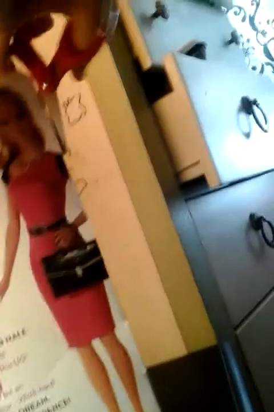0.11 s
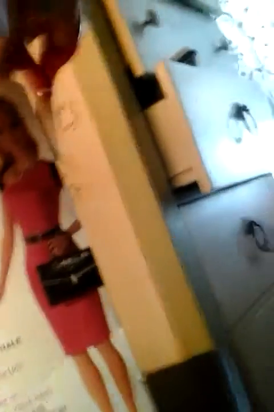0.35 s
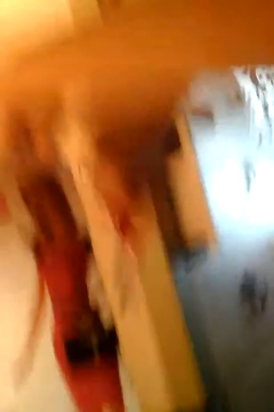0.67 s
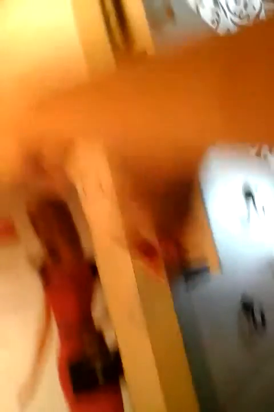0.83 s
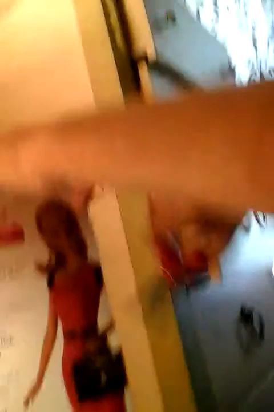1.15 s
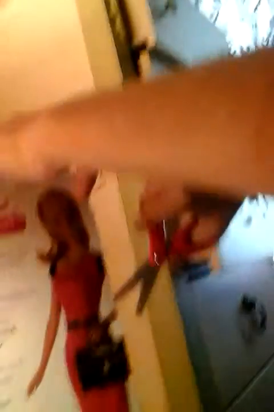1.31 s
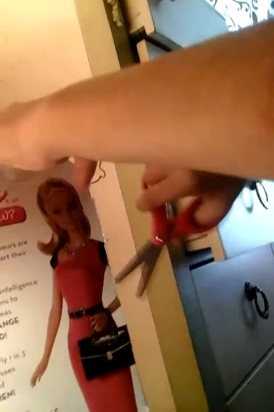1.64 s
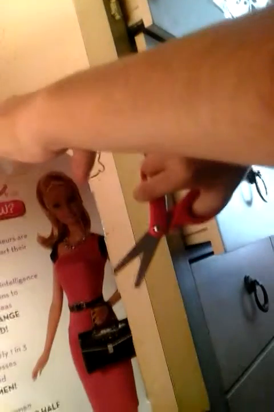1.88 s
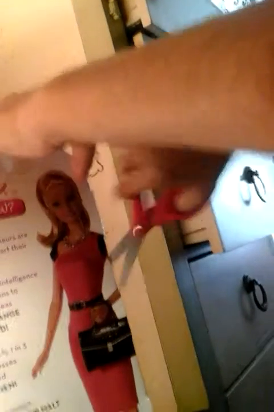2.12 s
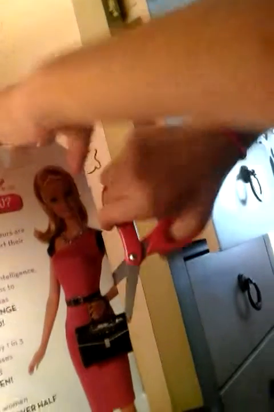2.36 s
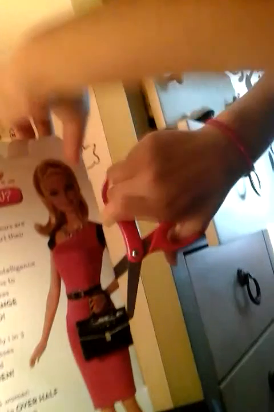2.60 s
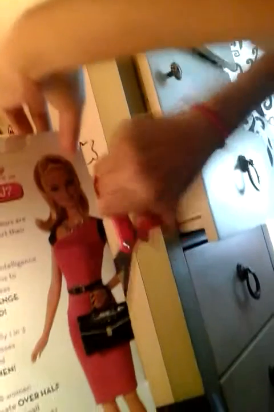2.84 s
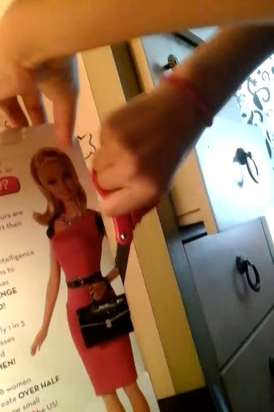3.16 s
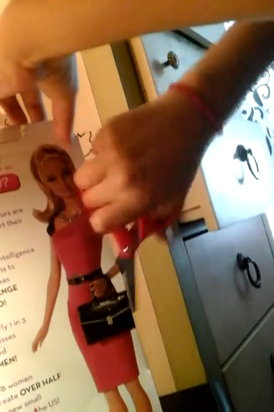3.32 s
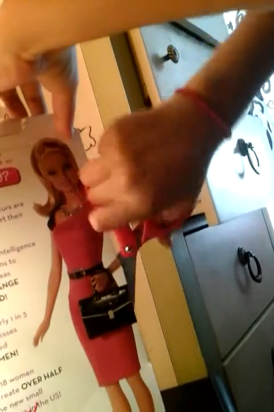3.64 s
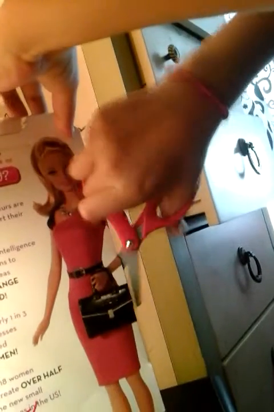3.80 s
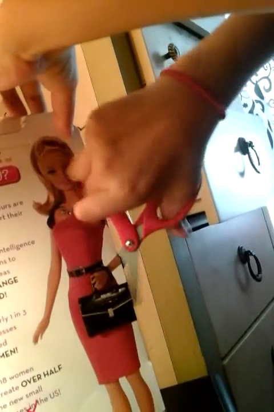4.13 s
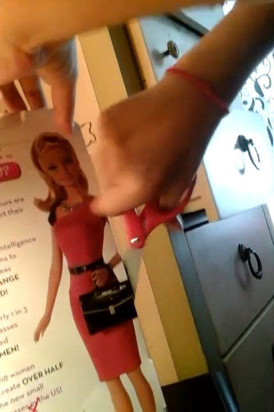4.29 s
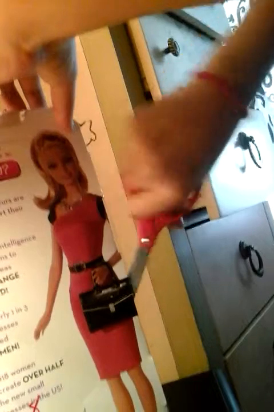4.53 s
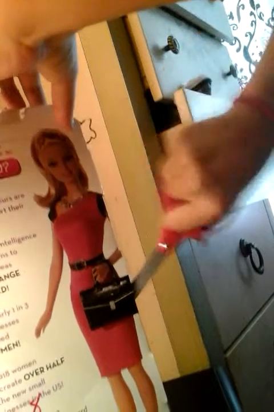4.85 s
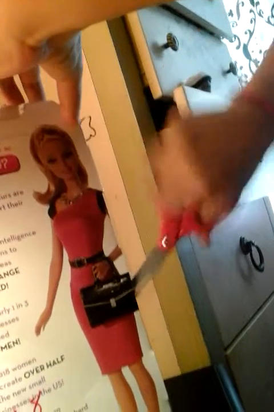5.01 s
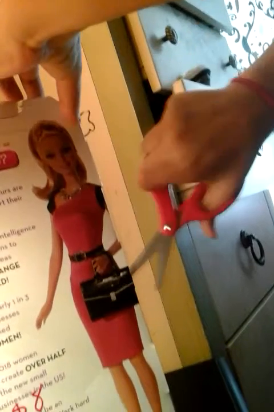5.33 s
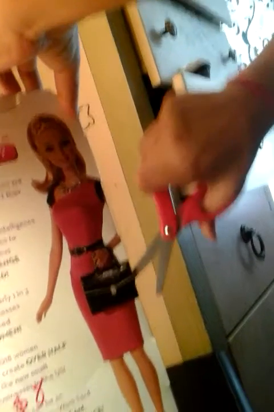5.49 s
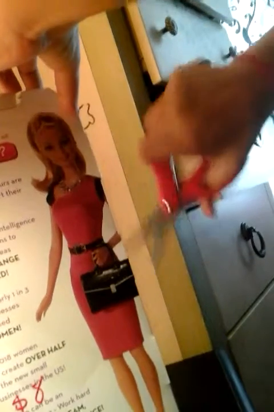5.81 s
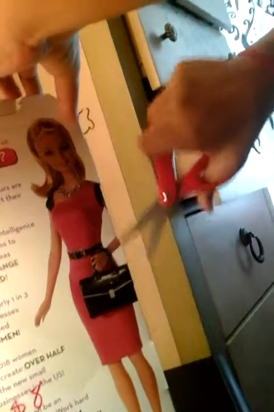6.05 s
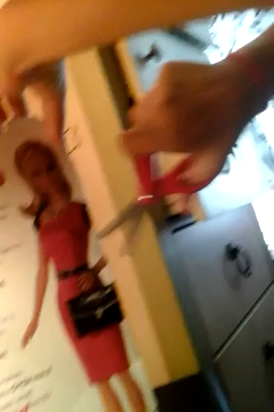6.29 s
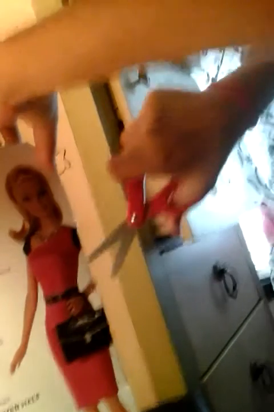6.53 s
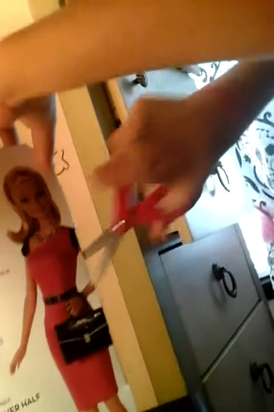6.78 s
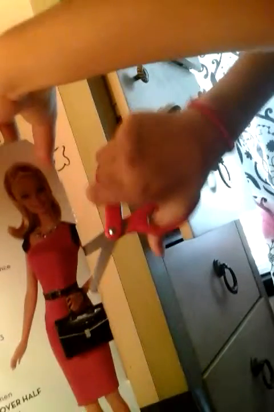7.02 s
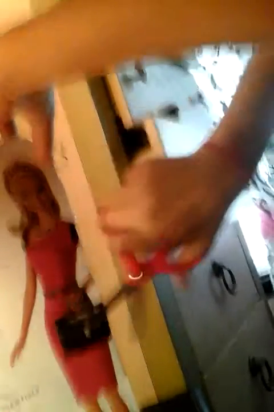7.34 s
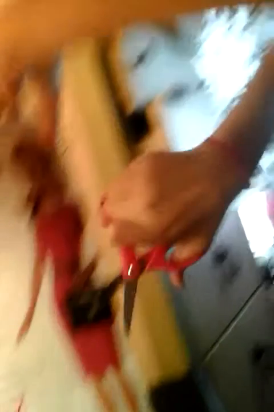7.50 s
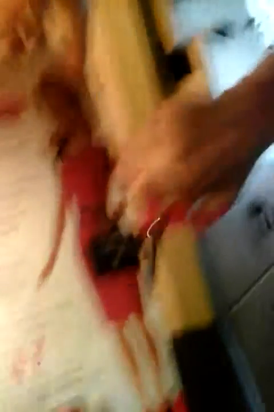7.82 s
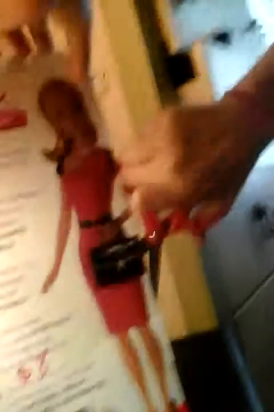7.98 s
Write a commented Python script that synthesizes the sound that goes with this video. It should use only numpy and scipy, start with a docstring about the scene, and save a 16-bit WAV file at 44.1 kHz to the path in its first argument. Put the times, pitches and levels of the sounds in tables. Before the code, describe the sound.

Scissors cut a hollow cardboard box near a phone microphone in a small room, with a short echo and faint room tone. Loud, crunchy snips land at 0.3 and 0.5 seconds, with scraping and a thin hiss of sliding blades. Light ticks follow until a single sharp snap at 2 seconds and a brief rasp. From 2.5 to 3.3 seconds comes a rapid cluster of cuts, hardest around 3 and 3.2, each tearing fibres and drumming the box. More snaps fall between 4.2 and 4.4 seconds, then a hollow knock at 4.5 and another snip at 5.1. Soft clicks and rubbing of fingers and blades fill the next stretch, with a moderate snip at 6.7. A rasping, scraping cut runs from 7.2 to 7.5 seconds, and a last loud snap with a hollow knock comes at 8. The loudest snaps distort slightly.

```python
"""A small room, close to a phone: scissors snip and knock at a hollow cardboard box.
Blades and fingers scrape over the board, and steel glides on steel with a thin hiss.
Each snap is a short burst of tearing fibres that also drums the box. A short echo and quiet room tone
sit underneath. The two microphones are wired in opposite sense, each behind a port with its own
resonance, and the loudest snaps clip."""
import sys
import numpy as np
from scipy import signal
from scipy.fft import rfft, irfft, next_fast_len
from scipy.io import wavfile
from scipy.ndimage import uniform_filter1d, map_coordinates

SR = 44100
rng = np.random.default_rng(int(sys.argv[2]) if len(sys.argv) > 2 else 0)


def put_to_file(sound):
    """Save the sound as 16-bit audio at rate SR, in the file named by the first command-line argument."""
    columns = np.atleast_2d(sound).T  # one column per channel
    safe = np.clip(columns, -1, 1)
    whole_steps = np.round(safe * 32767)
    wavfile.write(sys.argv[1], SR, whole_steps.astype(np.int16))


N = 359415


def amp(db):
    """Decibels to gain."""
    return 10 ** (np.asarray(db) / 20)


def unit(x):
    """Scaled to rms 1."""
    return x / np.sqrt(np.mean(x ** 2) + 1e-20)


def along(points, hz):
    """Read a curve of (Hz, value) points on a log frequency axis."""
    freqs, values = np.transpose(points)
    return np.interp(np.log(hz + 1), np.log(freqs + 1), values)


def wobble(rate):
    """A smooth random curve, rate knots a second."""
    return map_coordinates(rng.standard_normal(int(N * rate / SR) + 4), [np.arange(N) * rate / SR])


def filtered(x, response):
    """Pass x through a complex frequency response."""
    size = next_fast_len(x.shape[-1] + SR // 4)
    return irfft(rfft(x, size) * response(np.fft.rfftfreq(size, 1 / SR)), size)[..., :x.shape[-1]]


def colour(points):
    """A minimum-phase EQ through (Hz, dB) points."""
    def response(hz):
        cepstrum = irfft(np.log(amp(along(points, hz))))
        cepstrum[1:len(cepstrum) // 2] *= 2
        cepstrum[len(cepstrum) // 2 + 1:] = 0
        return np.exp(rfft(cepstrum))
    return response


def resonance(f, hz, width_hz):
    """One resonance of gain 1."""
    return 1j * f * width_hz / (hz * hz - f * f + 1j * f * width_hz)


# Stereo image of the diffuse sounds. Each row: frequency in Hz, left-right likeness from 0 to 1.
LIKENESS = [(60, 0.4), (150, 0.67), (350, 0.24), (700, 0.15), (1400, .04), (15000, .02)]
def paired(two):
    """Mix two unrelated signals to stereo: narrower in the bass, wide in the treble."""
    angle = lambda hz: np.arccos(along(LIKENESS, hz)) / 2
    mid, side = filtered(two, lambda hz: np.array([np.cos(angle(hz)), np.sin(angle(hz))]))
    return np.array([mid + side, mid - side])


# The background bed. Each row: frequency in Hz, relative noise density in dB.
HUSH_EQ = [(12, -57), (20, -22), (64, -12.5), (87, -7.5), (139, -4), (199, -9), (302, -12), (387, -16.5),
           (4200, -37), (6360, -33), (15000, -32)]
def hush(level_db=-57):
    """Quiet room tone and microphone hiss, drifting a little in level."""
    noise = filtered(rng.standard_normal((2, N)), lambda hz: amp(along(HUSH_EQ, hz)))
    return amp(level_db + 1.4 * wobble(8)) * unit(noise)


# The midrange voice of cardboard. Each row: frequency in Hz, gain in dB.
BOARD_EQ = [(100, -19.5), (300, -2.5), (900, -0.5), (1300, 5), (1800, 5), (2400, 4), (3500, -3),
            (6000, -24.5)]
def board(f):
    """The sheet colours every scrape and snap."""
    return colour(BOARD_EQ)(f)


# Panel and air modes of the box. Each row: frequency in Hz, width in Hz, gain in dB.
BOX_MODES = [(150, 47, 13), (305.6, 170, 24), (512, 70, 18), (645.4, 130, 21.5), (711, 68, 25.5),
             (790, 32, 27), (885, 80, 23.5), (1112, 480, 15)]
def box_ring(f, low_hz, high_hz):
    """The hollow box rings at its modes within a range, neighbours in opposite polarity."""
    return sum((-1) ** k * amp(db) * resonance(f, hz, width)
               for k, (hz, width, db) in enumerate(BOX_MODES) if low_hz < hz < high_hz)


def thud(f):
    """The big panels answer low."""
    return box_ring(f, 0, 570)


def drum(f):
    """The hollow note of the box: its upper modes, with the top rolled off."""
    return box_ring(f, 570, 2000) / (1 + 1j * f / 1500) ** 2


def swell(times, db, depth_db=16):
    """Power of one stroke: it starts at the earliest of three times, peaks, and ends at the latest."""
    away = np.interp(np.arange(N) / SR, np.sort(times), [1, 0, 1])
    level_db = db - depth_db * away ** 1.4  # lingers near its loudest and ends quickly
    return np.where(away < 1, amp(level_db) ** 2, 0)


# Strokes over the board. Each row: three swell times in seconds (in any order), rasp level in dB,
# box level in dB against the rasp.
STROKES = [(-.4, 0.018, 0.9, -58.5, -0.5), (0.193, 0.308, 0.26, -52, 5.5), (0.4, 0.451, 0.46, -50, 6.5),
           (0.587, 0.633, 0.65, -57.5, -2), (1.26, 1.299, 1.33, -68, 8.5), (1.975, 2.013, 2.025, -52.5, 9),
           (2.11, 2.232, 2.315, -45, -1), (2.2, 2.25, 2.39, -53.5, -4), (2.66, 2.757, 3.7, -55.5, 6.5),
           (3.046, 3.12, 2.9, -62, -7), (3.198, 3.24, 3.245, -44, -2), (3.39, 3.5, 2.2, -70.5, 10),
           (4.012, 4.048, 4.055, -58, 3), (4.875, 4.997, 4.92, -63.5, 4), (5.01, 5.023, 5.07, -52, 15.5),
           (5.052, 5.072, 5.05, -46, -3), (5.163, 5.21, 5.37, -61.5, 6), (5.451, 5.619, 6.195, -70.5, 6),
           (6.5, 6.6, 7.3, -65.5, 4), (6.68, 6.788, 6.98, -55, 3), (7.153, 7.219, 7.26, -36.5, -2),
           (7.198, 7.318, 7.52, -42.5, 8.5), (7.306, 7.437, 7.49, -47.5, 9),
           (7.691, 7.742, 7.87, -63.5, 11.5), (7.743, 7.777, 7.84, -53.5, 6), (7.776, 7.864, 7.9, -54.5, 7),
           (7.984, 8.039, 8.05, -39.5, 5), (7.998, 8.114, 8.3, -49.5, 13)]
def strokes(board_db=-5):
    """Gains of rasp, board and box: strokes over the faint fidget of hands that never rest."""
    floor = amp([-76.5, -76.5, -72.5])[:, None]
    fidget = (floor * amp(2.7 * wobble(13))) ** 2
    swells = np.array([swell(times, db) for *times, db, _ in STROKES])
    shares = amp([[0, board_db, box_db] for *_, box_db in STROKES]) ** 2
    return uniform_filter1d(np.sqrt(fidget + shares.T @ swells), size=300)


# The bright rasp of friction. Each row: frequency in Hz, gain in dB.
RASP_EQ = [(1200, -33.5), (2500, -1.5), (5000, -4.5), (8000, -12.5), (15000, -14.5)]
def scrape(crackles_per_s=150, crackle_t60_s=0.0039):
    """Steel and skin drag over the board: noise that catches and lets go, with fine crackle."""
    grip = amp(1.5 * wobble(30) + 1.5 * wobble(100))
    catches = (rng.random(N) < crackles_per_s / SR) * rng.random(N) * 2.2
    crackle = np.convolve(catches, amp(-60 * np.arange(200) / SR / crackle_t60_s))[:N]
    friction = grip * (1 + crackle) * rng.standard_normal((3, 2, N))
    bodies = colour(RASP_EQ), board, lambda f: drum(f) + amp(-12.5) * thud(f)
    layers = zip(strokes(), friction, bodies)
    return sum(gain * unit(filtered(noise, body)) for gain, noise, body in layers)


# Blade on blade. Each row: start, loudest moment and end in seconds, level in dB.
BLADE_SLIDES = [(-.3, 0.062, 0.29, -65.5), (0.33, 0.38, 0.46, -60), (2.144, 2.244, 2.33, -56.5),
                (6.68, 6.76, 6.86, -64)]
def blade_slide(centre_hz=5380, width_hz=700):
    """The blades glide over each other with a thin, narrow hiss."""
    hiss = filtered(rng.standard_normal((2, N)), lambda f: resonance(f, centre_hz, width_hz) ** 2)
    envelope = np.sqrt(sum(swell(times, db) for *times, db in BLADE_SLIDES))
    return envelope * amp(0.84 * wobble(40)) * unit(hiss)


def ticks(count):
    """Faint ticks of handling at random moments, as rows of snaps."""
    return [(when * N / SR, -54 + np.log(force + 0.059), -10.5, -10.5, -31)
            for when, force in rng.random((count, 2))]


def tear(db, rise_s):
    """Left and right noise bursts for the five layers of a snap: fibres, board, drum, thud, edge."""
    t = np.arange(SR // 16) / SR
    t60_s = 0.029 * amp(0.06 * (db + 20.5))  # hard snaps tear longer
    envelope = amp(-60 * t / t60_s) * (1 - np.exp(-t / rise_s)) ** 2
    strength = np.linalg.norm(envelope)
    lumps_db = 2 * np.repeat(rng.standard_normal(len(t) // 32 + 1), 32)  # fibres part in bunches
    bursts = envelope * amp(lumps_db[:len(t)]) * rng.standard_normal((2, 5, len(t)))
    bursts[:, 2, np.argmax(envelope)] += 0.6 * strength  # the blow itself strikes the drum
    left, other = bursts / np.linalg.norm(bursts, axis=2, keepdims=True) * strength / envelope.max()
    shared = np.array([.75, .75, .8, .95, .75])[:, None]  # what both microphones hear alike
    return left, shared * left + np.sqrt(1 - shared ** 2) * other


# The crunch of tearing fibres. Each row: frequency in Hz, gain in dB.
FIBRE_EQ = [(1500, -37.5), (2600, -8), (4000, -5.5), (6000, -10), (8000, -17), (11000, -30)]
# The sharp edge on top of a snap. Each row: frequency in Hz, gain in dB.
EDGE_EQ = [(5000, -17), (8000, 0), (11000, -4), (15000, -6)]
# Snips and knocks. Each row: time in seconds, burst level in dB, then the sends to board, box and
# edge in dB against that level.
SNAPS = [(0.048, -40, -12, -4.5, -12), (0.235, -38, 0, 1, -9), (0.284, -22.5, -13, -13.5, -12.5),
         (0.322, -32, -4, -11, -17), (0.3328, -0.5, -15, -25.5, -16.5), (0.4591, 1, -2.5, -13.5, -32),
         (0.467, -5, -6, -13.5, -20), (0.4746, -3.5, -8.5, -12, -13), (0.6624, -28.5, -37, -22.5, -26),
         (0.7307, -29, -38.5, -32, -7.5), (0.848, -29, -20, -13, -12), (1.2717, -47.5, -6, -8.5, -22),
         (1.2994, -47, -9, -1, -15), (1.473, -33.5, -13, -11, -19), (1.652, -27, -7.5, -9.5, -26),
         (1.6963, -41, -6, -7.5, -14), (1.7579, -39, -8.5, -21.5, -18.5), (1.8399, -43.5, -18, -12, -26),
         (2.0236, -2, -16, -16.5, -23.5), (2.174, -28.5, -18, -37, -12), (2.2601, -29.5, -18, -8, -26),
         (2.5077, -22.5, -25, -15, -28.5), (2.5234, -31.5, -27.5, -13, -31), (2.5584, -30, -13, -18, -27),
         (2.574, -22, -13, -15, -20), (2.5988, -10, -21, -20, -42), (2.607, -6, -19.5, -23.5, -35),
         (2.7162, -39, -16, -23.5, -17), (2.7402, -30.5, -8, -19, -29), (2.768, -20, -11, -16.5, -38),
         (2.7779, -17, -13, -22, -37), (2.7888, -7.5, -28, -38, -45), (2.7933, -14, -7, -19, -23.5),
         (2.832, -5, -9.5, -25, -48), (2.941, -33, -7, -14, -27), (2.9742, -10, -20, -6, -13),
         (2.9799, 2.5, -25, -12.5, -12), (3.0068, -6.5, -14, -18, -10.5), (3.2387, 2.5, -12, -10.5, -11.5),
         (3.3572, -27.5, -9.5, -25, -19), (3.463, -45, -10, -12, -24.5), (3.526, -45, -8, -12, -25),
         (3.5877, -37.5, -16.5, -18, -27), (3.605, -44, -15, -15, -25), (3.625, -44, -11, -12, -25),
         (3.719, -46, -14, -3, -25), (3.7519, -39, -13.5, -9.5, -15.5), (3.767, -30, -10, -4.5, -32),
         (3.958, -42, -18, -24, -16), (3.9996, -48, -5, -13, -19), (4.052, -24.5, -9.5, -8.5, -16.5),
         (4.11, -34, -8, -11, -20), (4.1357, -29, -23, -7.5, -21), (4.1699, -0.5, -14, -13, -8),
         (4.2862, -6, -4.5, -6.5, -37), (4.3116, -16, -2.5, -10.5, -19), (4.3515, -22, -10, -14, -37),
         (4.38, -29, -9, -5, -15), (4.3889, -5, -17, -21, -21.5), (4.4124, -23.5, -19, -6, -17),
         (4.4794, -38, -10, -4.5, -25), (4.5258, -19, -10, 5, -19), (4.701, -34, -25, -20, -24),
         (4.9282, -37, -34, -21, -24), (5.0116, -40, -11, -2.5, -28), (5.0274, -40.5, -5, 0, -14),
         (5.0435, -35.5, -10, -3, -15), (5.0747, -26.5, -12, -9, -18), (5.0815, -9, -7, -7.5, -18),
         (5.203, -38.5, -19, -19, -32), (5.246, -39, -1, -6, -24), (5.364, -31.5, -11, -18.5, -25.5),
         (5.3865, -37.5, -20, -12, -11.5), (5.43, -45.5, -9.5, -7.5, -22.5), (5.47, -46.5, -12, -14.5, -22),
         (5.548, -46, -16, -9.5, -24.5), (5.6593, -35.5, -22.5, -20, -25), (5.679, -34.5, -10, -8.5, -27),
         (5.6924, -30, -15, -13, -31), (5.747, -36.5, -20, -7, -25), (5.7575, -33, -7, -6, -32),
         (5.7778, -34, -10, -12, -24), (5.8062, -42.5, -10, -17, -14), (5.928, -27.5, -8, -8, -28),
         (5.9714, -33, -11, -4, -18), (6.195, -54.5, 4.5, -5, -30), (6.2409, -25, -10, -20.5, -30),
         (6.332, -47.5, -20, -18, -17.5), (6.3821, -46.5, -7, -10.5, -17), (6.394, -40.5, -4, -9.5, -20.5),
         (6.464, -47, -20.5, -23.5, -17.5), (6.647, -41.5, -14, -10, -22), (6.6689, -14, -10, -13, -22),
         (7.1536, -21.5, -18, -17, -22), (7.16, -17, -12, -9.5, -23), (7.1896, -19.5, -11.5, -17, -25),
         (7.2151, -9, -18.5, -26, -13), (7.2254, -13, -14, -15.5, -14), (7.2544, -23.5, -15, -16, -6.5),
         (7.4039, -28, -2, -15, -25), (7.584, -35, -25, -20.5, -20), (7.6386, -39, -26, -20.5, -26.5),
         (7.7069, -41, -23.5, -8, -25.5), (7.7528, -33.5, -9.5, -8, -31), (7.9673, -35.5, -20, -10, -44),
         (8.0202, -22, -25, -5, -28), (8.0441, -3.5, -15.5, -12.5, -16), (8.0686, -31, -2, 8, -20)]
def snaps(rise_s=0.00105):
    """Each snap or tick is a lumpy burst of tearing that sounds the board and drums the box."""
    bus = np.zeros((5, 2, N + SR))
    for time_s, db, board_db, box_db, edge_db in SNAPS + ticks(count=28):
        thud_db = box_db - 10.5 - 0.095 * (db + 20)  # the big panels take less of a hard snap
        gains = amp(db + np.array([0, board_db, box_db, thud_db, edge_db]))[:, None]
        pan_db = rng.normal(-0.27, 1.5)  # the box sits a little to the right
        left, right = tear(db, rise_s)
        lag = round(abs(rng.normal(11, 4)))  # samples between the microphones
        start = max(round((time_s - rise_s) * SR), 0)
        bus[:, 0, start:][:, :left.shape[1]] += gains * amp(pan_db / 2) * left
        bus[:, 1, start + lag:][:, :right.shape[1]] += gains * amp(-pan_db / 2) * right
    bodies = colour(FIBRE_EQ), board, drum, thud, colour(EDGE_EQ)
    return sum(filtered(bursts, body) for bursts, body in zip(bus[..., :N], bodies))


# The small room's tail. Each row: frequency in Hz, time to fall 60 dB in seconds.
ROOM_DECAY = [(150, .22), (800, 0.23), (3000, 0.2), (7000, 0.2), (13000, 0.22)]
def room(x, predelay_samples=150):
    """Each frequency of the echo dies at its own speed; the paths change as hands and box move."""
    wet, step = np.zeros((2, N + SR)), SR // 4
    for start in range(0, N, step):  # a fresh random tail every quarter second
        hz, t, spectrum = signal.stft(rng.standard_normal((2, SR // 3)), SR, nperseg=256)
        decay = amp(-60 * t / along(ROOM_DECAY, hz)[:, None])
        _, tail = signal.istft(spectrum * decay, SR, nperseg=256)
        echo = signal.fftconvolve(x[:, start:start + step], tail / np.linalg.norm(tail[0]), axes=1)
        wet[:, start + predelay_samples:][:, :echo.shape[1]] += echo
    return wet[:, :N]


def scene():
    """The scissors and box at arm's length, and their echo."""
    cuts = snaps()
    rubs = scrape() + blade_slide()
    echo = amp(-7.5) * room(cuts + rubs)
    return cuts + paired(rubs + echo)


# The microphone ports, left then right. Each row: resonance in Hz, width in Hz, boost in dB.
MIC_PORTS = [(6960, 2700, 7.5), (5712, 800, 14)]
def ports(f):
    """Each port rings at its own treble peak."""
    return np.array([1 + (amp(db) - 1) * resonance(f, hz, width) for hz, width, db in MIC_PORTS])


def record(dry):
    """Port resonances, background hush, opposite polarity, soft clipping and a steep high cut."""
    wired = (filtered(dry, ports) + paired(hush())) * [[1], [-1]]
    lopsided = wired - 0.03 * wired ** 2  # the microphones yield more to one side of a loud wave
    clipped = lopsided / (1 + np.abs(lopsided) ** 8) ** (1 / 8)
    return filtered(clipped, lambda hz: 1 / (1 + (hz / 14600) ** 80))


dry = scene()
out = record(dry)
put_to_file(out)
```